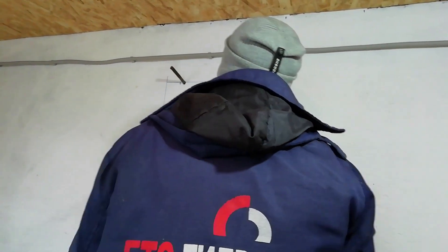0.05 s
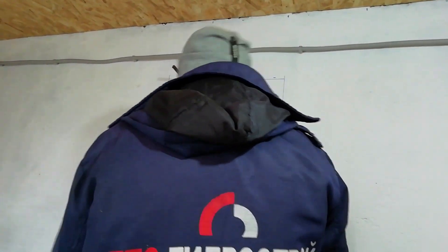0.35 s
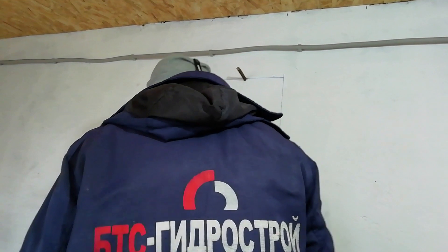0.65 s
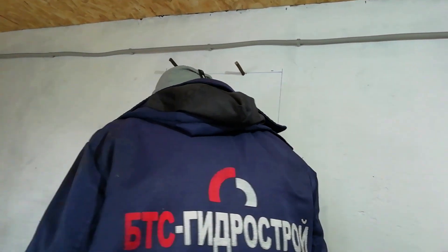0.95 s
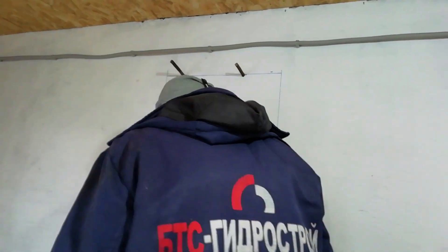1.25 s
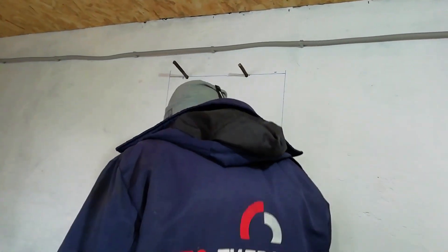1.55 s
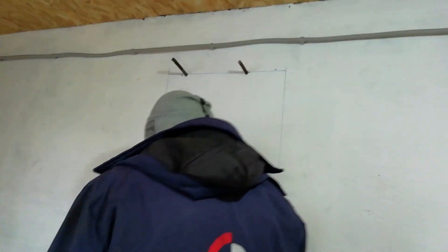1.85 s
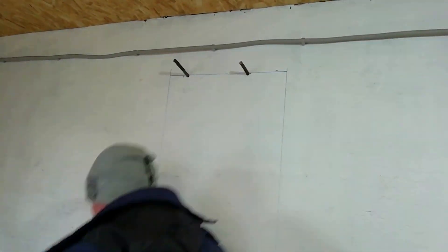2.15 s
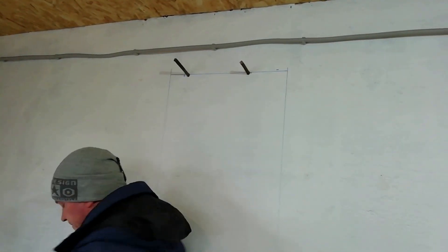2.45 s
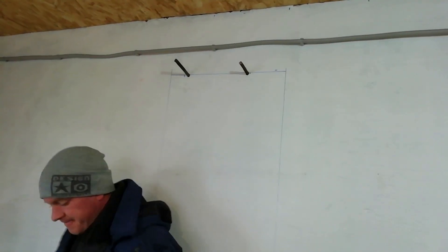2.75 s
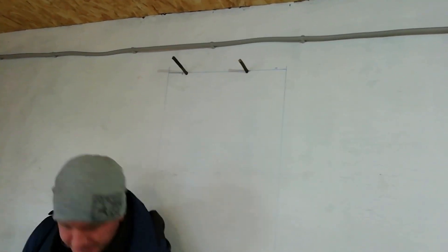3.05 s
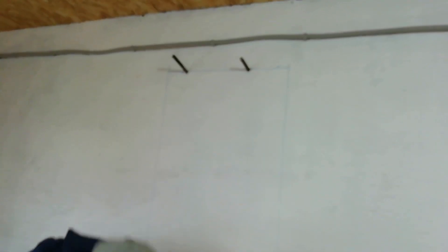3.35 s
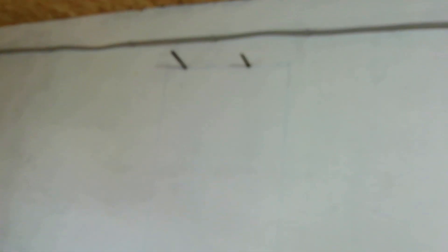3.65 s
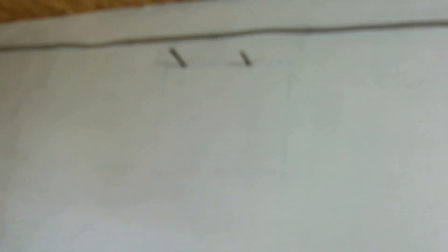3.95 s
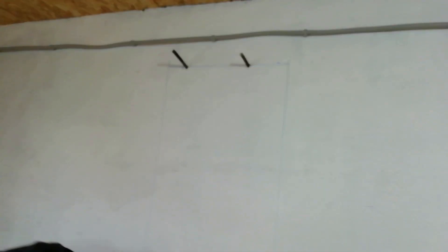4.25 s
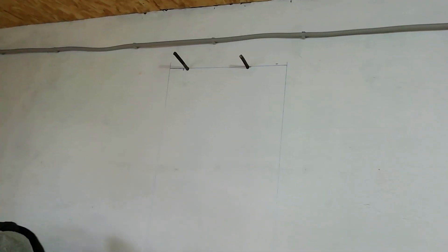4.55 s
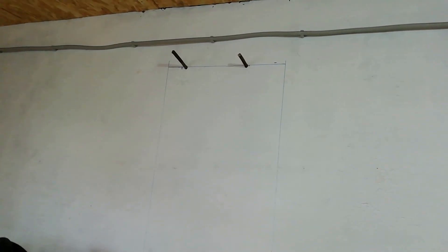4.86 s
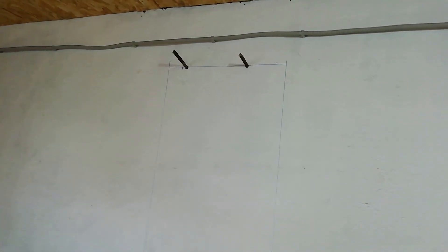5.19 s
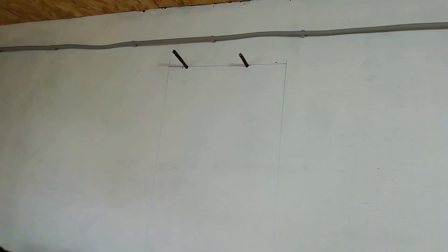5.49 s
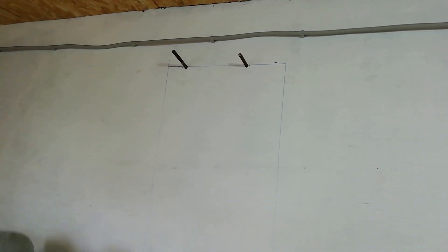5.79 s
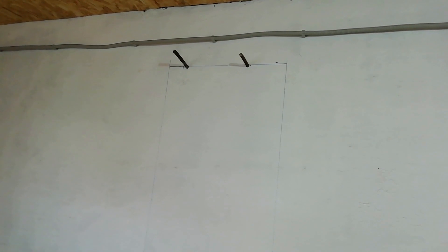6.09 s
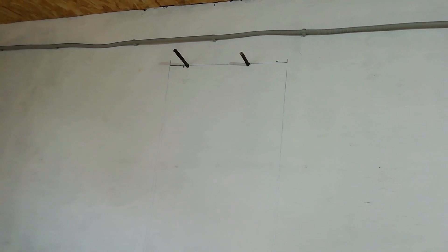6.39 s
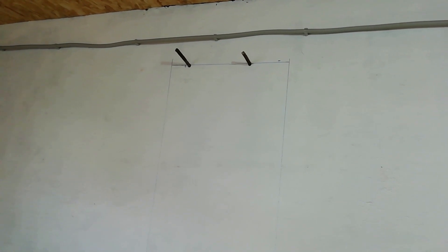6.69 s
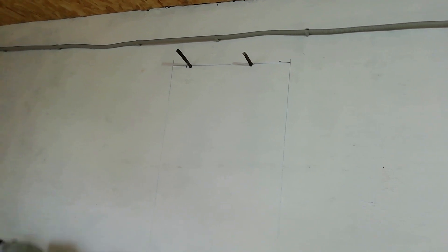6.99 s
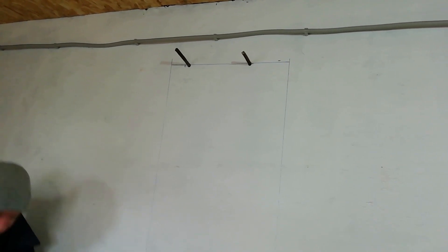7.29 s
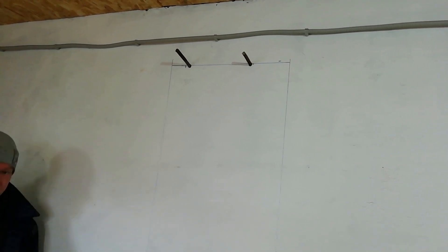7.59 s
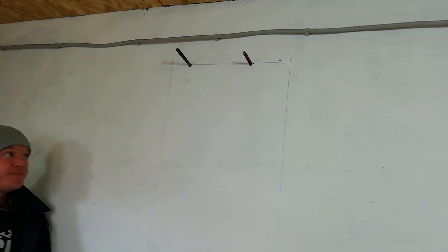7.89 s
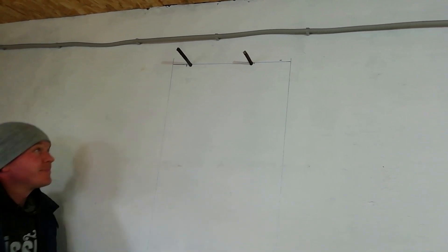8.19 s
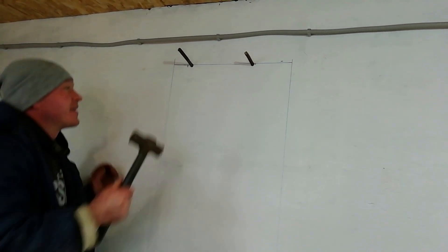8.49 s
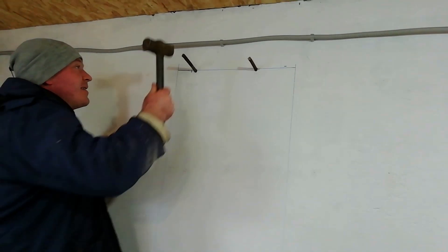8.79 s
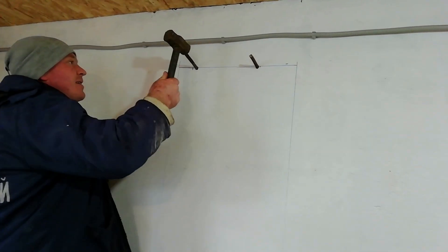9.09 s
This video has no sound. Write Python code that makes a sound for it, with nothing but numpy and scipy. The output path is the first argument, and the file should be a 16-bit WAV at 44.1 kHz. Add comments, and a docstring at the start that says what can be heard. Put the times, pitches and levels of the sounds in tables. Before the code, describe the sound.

In a bare room, a steel pin is worked into a plaster wall with small, dry taps. Boots step down from a wooden stand, with rustling clothes and gritty scuffs. The stand is shifted and its loose boards knock loudly in two hollow clusters. After a few softer steps, one heavy hammer blow lands on the pin, with a bright steel ring and a low boom from the wall.

```python
"""In a bare plastered room a workman in a padded jacket seats a steel pin in the wall with small taps.
From 2 s he climbs off a wooden stand: impacts of boots and boards excite broad resonances and low room
modes, while the friction of cloth and gritty soles hisses and rasps. From about 5 s he shifts the stand
along the wall and its loose boards knock. He steps up and, just after 9 s, lands one heavy hammer blow
on the pin: the steel rings in high modes and the wall booms in low ones."""
import sys
import numpy as np
from scipy import signal
from scipy.fft import rfft, irfft, next_fast_len
from scipy.io import wavfile

SR = 44100
rng = np.random.default_rng(int(sys.argv[2]) if len(sys.argv) > 2 else 0)


def pcm_store(signal):
    """Save signal as 16-bit PCM."""
    levels = np.round(np.clip(np.atleast_2d(signal), -1, 1) * 32767)
    wavfile.write(sys.argv[1], SR, levels.astype(np.int16).T)


N = 407484
TAP_HZ = np.fft.rfftfreq(4096, 1 / SR)  # frequencies at which filter gains are given
AGE = np.arange(SR) / SR  # seconds since a contact
MIC_LAG = 26  # samples of travel between the two microphones

# Spectrum of still air and microphone hiss. Each row: frequency in Hz, relative level in dB.
AIR_SPECTRUM = [(20, -5), (45, -3), (62, -10), (81, 2), (110, -6), (160, -6), (330, -11), (520, -17),
                (1100, -13), (1500, -13), (1830, -9), (2300, -18), (4000, -23), (9000, -28), (16000, -27)]
# Standing waves of the room. Each row: frequency in Hz, gain in dB, t60 (time to fall 60 dB) in seconds.
ROOM_MODES = [(84, -1, 0.51), (215, -8, 0.48), (246, -6.5, 0.6), (284, -8, 0.6), (309, -4, .55),
              (343, -17, 1.5), (450, -5.5, 0.64)]
# Strokes of soles and cloth. Each row: time of the peak in seconds, swell and fade over 20 dB in seconds,
# hiss level in dB, rasp offset in dB.
STROKES = [(0.17, 0.09, 0.31, -68, 8), (2.29, 0.014, 0.11, -42, -3), (2.727, 0.035, 0.075, -32.5, 0.5),
           (3.012, 0.029, 0.021, -42, 3.5), (3.52, 0.078, 0.2, -53, 3.5), (3.668, 0.09, 0.14, -38.5, 0.5),
           (3.86, 0.078, 0.092, -40.5, 5.5), (4.16, .2, .12, -62, -0.5), (4.39, 0.17, 0.21, -49.5, -3.5),
           (4.575, 0.071, .12, -55, -5), (4.862, 0.029, 0.34, -38, -1.5), (5.12, 0.11, 0.16, -40.5, 0),
           (5.245, 0.12, 0.093, -29.5, 2), (6.26, 0.12, 0.91, -49.5, 6), (6.68, 0.11, 0.27, -38, 7.5),
           (6.795, 0.12, 0.062, -35, 3.5), (7.7, .25, .25, -56, -8), (7.95, 0.098, 0.17, -55, 11.5),
           (8.5, .4, .8, -66.5, -6), (8.85, 0.034, 0.21, -38, 0), (9.0, 0.03, 0.26, -44.5, 4.5),
           (9.138, 0.044, .02, -48, 10)]
# Spectra of fine and of coarse friction. Each row: frequency in Hz, relative level in dB.
HISS_SPECTRUM = [(1180, -23), (2000, -7.5), (2380, -7), (3430, -9.5), (4990, -11), (7380, -9.5),
                 (9010, -20.5), (9740, -17), (14700, -14), (16000, -25.5)]
RASP_SPECTRUM = [(88, -39.5), (150, -6), (280, -3.5), (341, -10), (404, -7.5), (441, -5), (636, -7),
                 (765, -6), (1060, 0.5), (1670, -4), (2800, -19.5), (3640, -44), (6160, -120)]
# Soft footfalls and flexing boards. Each row: start in seconds, frequency in Hz, level in dB.
SOFT_BOOMS = [(2.625, 162, -43), (3.885, 458, -35.5), (5.35, 220, -32), (5.455, 183, -28.5),
              (6.29, 211, -37), (6.68, 454, -34), (7.49, 162, -50), (7.945, 232, -46), (8.87, 292, -45.5)]
# Sharp clacks and metal clinks. Each row: start in seconds, frequency in Hz, level in dB, t60 in seconds.
LIGHT_CLINKS = [(0.063, 1900, -31, .1), (0.17, 1710, -50.5, 0.87), (0.651, 3300, -42, .15),
                (2.328, 1190, -39, 0.082), (2.882, 2520, -60, .55), (4.388, 1800, -37.5, 0.1),
                (5.331, 1370, -21.5, 0.1), (5.332, 3180, -29, 0.18), (7.181, 1470, -43, 0.45),
                (8.61, 3000, -61, .28), (8.991, 1700, -43, 0.12)]
# Grains of grit snapping. Each row: start in seconds, frequency in Hz, level in dB, t60 in seconds.
GRIT_SNAPS = [(0.527, 13000, -56, 0.47), (1.039, 13500, -41, 0.15), (1.241, 13000, -59, .3),
              (2.165, 13000, -46.5, .15), (6.403, 13200, -37.5, .15), (8.68, 9800, -52.5, 0.36)]
# The four bands of an impact: thump, boom, clack, grit. Each row: low and high edge in Hz, gain in dB,
# t60 in seconds at a damping of 1, time constant of the contact in seconds, factor on the rise time.
IMPACT_BANDS = [(71, 163, -9.5, 0.66, 0.0077, 1.1), (172, 624, -5.5, 0.5, 0.0065, 1.5),
                (543, 3030, -2, .5, 0.0053, 1.33), (2600, 24000, -2.5, 0.62, 0.012, 1.6)]
# Boots landing on floor and stand, then loose boards knocking together. Each row: start in seconds,
# clack level in dB, boom level in dB, body resonance in Hz, clack resonance in Hz.
BOOT_STEPS = [(0.001, -35.5, -38.5, 236, 1090), (0.06, -30.5, -29.5, 396, 1380),
              (2.159, -36, -30, 288, 950), (2.247, -35.5, -34, 220, 760), (2.617, -43.5, -42, 171, 950),
              (3.003, -42.5, -47, 154, 1700), (3.501, -35, -40.5, 215, 1670),
              (3.887, -25.5, -24.5, 302, 740), (4.386, -41, -57, 292, 1790), (6.098, -56, -54, 215, 1850),
              (6.167, -45, -43.5, 242, 820), (6.398, -26.5, -19.5, 236, 930),
              (6.619, -32, -23.5, 430, 1140), (6.698, -25.5, -34, 212, 1360), (6.821, -34, -16, 268, 1230),
              (7.158, -41.5, -68, 220, 1480), (7.354, -43.5, -66, 194, 917), (7.908, -44, -60, 535, 1570),
              (8.064, -47.5, -57, 342, 1298), (8.179, -47, -78, 175, 1800), (8.26, -42, -32, 337, 1310),
              (8.88, -39, -37, 297, 1500), (8.987, -40, -66, 320, 1590)]
BOARD_KNOCKS = [(2.035, -34.5, -50.5, 342, 1120), (2.134, -33, -28.5, 250, 570),
                (2.326, -37.5, -26, 285, 1000), (5.278, -15, -18, 323, 1270),
                (5.329, -13, -20.5, 335, 1390), (5.41, -27.5, -19.5, 380, 1170),
                (6.415, -15.5, -12, 320, 1170), (6.463, -23, -11.5, 329, 1300),
                (6.754, -41, -19.5, 444, 1180)]
# Responses of the struck boards and of the pin in plaster. Each row: frequency in Hz, gain in dB.
WOOD_SPECTRUM = [(50, -12), (90, 3.5), (135, -11), (230, 3.5), (420, -0.5), (560, -10.5), (780, -4),
                 (1400, -2), (2000, -5.5), (2600, -15.5), (4200, -19), (7200, -19), (8800, -29),
                 (15000, -27)]
PLASTER_SPECTRUM = [(60, -16), (200, -12.5), (300, -6), (375, -2), (460, -3), (570, -21), (750, -1.5),
                    (960, -5), (1120, -0.5), (1420, -4), (1850, -4), (2600, -16), (7200, -14), (9000, -24),
                    (15000, -21)]
# The pin worked into its hole by hand. Each row: start in seconds, clack level in dB, boom level in dB,
# clack resonance in Hz.
SEATING_TAPS = [(0.524, -30.5, -39.5, 960), (0.648, -31, -37.5, 1810), (0.689, -40.5, -34.5, 1840),
                (0.721, -33, -37.5, 1860), (0.761, -33.5, -45, 1770), (0.824, -51, -60, 1800),
                (1.057, -35.5, -50, 1180), (1.084, -30.5, -37.5, 1110), (1.139, -38.5, -40.5, 754),
                (1.239, -39.5, -53, 1600), (1.319, -44.5, -46, 778), (1.389, -54.5, -49, 1024)]
# Spectrum of the hammer's thud and crack. Each row: frequency in Hz, relative level in dB.
BLOW_SPECTRUM = [(24, -52), (40, -9), (144, -6), (204, -7), (320, -8), (542, -9), (896, -9.5),
                 (1410, -23.5), (1760, -20), (2840, -26.5), (7000, -30), (9220, -49), (13100, -44),
                 (16000, -78)]
# Modes of pin and hammer head, then of the wall. Each row: frequency in Hz, level in dB, t60 in seconds.
STEEL_MODES = [(1760, -33, .35), (1900, -37, .15), (3908, -33, .5), (4660, -42, .2), (5373, -41, .4),
               (6853, -35, .35), (7050, -37, .25), (10750, -47, .16), (11080, -53, .3), (12810, -36, .19),
               (14120, -51, .13)]
WALL_MODES = [(75, -35, .8), (147, -26, .9), (250, -32, .7), (285, -33, .7), (317, -26, .7), (430, -29, .5),
              (822, -32, .45)]
# Unequal response of the two microphones. Each row: frequency in Hz, left minus right in dB.
MIC_BALANCE = [(100, 0.5), (400, -1), (900, -1), (1300, -3.5), (1900, -5.5), (2800, 1), (5200, -0.5),
               (6300, -5), (7300, -16), (8500, -3), (10000, 2.5), (12500, 14), (15500, 13.5)]


def amp(db):
    """Amplitude grows tenfold with every 20 dB."""
    return 10 ** (np.asarray(db) / 20)


def unit(x):
    """Normalisation to an rms of 1."""
    return x / np.sqrt(np.mean(x ** 2) + 1e-20)


def unit_attack(x):
    """Normalisation of a transient to an rms of 1 over its first 30 ms."""
    return x / np.sqrt(np.mean(x[..., :round(.03 * SR)] ** 2) + 1e-20)


def response(spectrum, hz=TAP_HZ):
    """Frequency response as an amplitude, interpolated in dB over log frequency."""
    known_hz, db = np.transpose(spectrum)
    return amp(np.interp(np.log(hz + 1), np.log(known_hz + 1), db))


def add(mix, start_s, sound):
    """Superposition: a sound adds to the mix from its start onward."""
    part = mix[..., max(round(start_s * SR), 0):][..., :sound.shape[-1]]
    part += sound[..., :part.shape[-1]]


def colour(x, gain):
    """Minimum-phase filtering: the phase follows from the log gain by the Hilbert transform."""
    log_gain = np.log(np.maximum(gain / gain.max(), 1e-5))
    mirrored = np.r_[log_gain, log_gain[-2:0:-1]]
    transfer = np.exp(np.conj(signal.hilbert(mirrored)))
    taps = np.fft.ifft(transfer).real
    return signal.oaconvolve(x, taps[None], axes=1)[:, :x.shape[1]]


def band(lo_hz, hi_hz):
    """Band-pass gain, falling 36 dB per octave beyond each edge."""
    return 1 / np.sqrt((1 + (lo_hz / (TAP_HZ + 1)) ** 12) * (1 + (TAP_HZ / hi_hz) ** 12))


def resonance(hz, width_hz):
    """Lorentzian resonance curve, with its full width taken at half height."""
    return 1 / (1 + (2 * (TAP_HZ - hz) / width_hz) ** 2)


def diffuse(size):
    """A diffuse noise field at two spaced points is coherent in the bass and incoherent in the treble."""
    padded = next_fast_len(size)
    left, independent = rfft(rng.standard_normal((2, padded)))
    coherence = np.sinc(2 * MIC_LAG * np.arange(len(left)) / padded)
    right = coherence * left + np.sqrt(1 - coherence ** 2) * independent
    return irfft([left, right], padded)[:, :size]


def still_air(level_db=-62.3):
    """Stationary noise: the air of the room and microphone hiss."""
    return amp(level_db) * unit(colour(diffuse(N), response(AIR_SPECTRUM)))


def room(x, wet_db, t60):
    """Reverberation: a diffuse echo follows the direct sound, which reaches the right side first."""
    tail = diffuse(SR) * amp(-60 * AGE / t60)
    echo = signal.oaconvolve(x[None], tail / np.linalg.norm(tail[0]), axes=1)[:, :len(x)]
    delayed = np.r_[np.zeros(MIC_LAG), x[:-MIC_LAG]]
    direct = np.array([delayed, x])
    return (direct + amp(wet_db) * echo) / np.hypot(1, amp(wet_db))


def standing_waves(x):
    """Forced resonance: low room modes hum on after the knocks that drive them."""
    hum = np.zeros(SR)
    for hz, db, t60 in ROOM_MODES:
        scale = 2 * np.log(1000) / (t60 * SR)  # makes db the gain at resonance
        hum += scale * amp(db - 60 * AGE / t60) * np.sin(2 * np.pi * hz * AGE)
    return signal.oaconvolve(x.mean(0), hum)[:N]


def friction(spectrum, slips_per_s, spread_db, smooth):
    """Stick-slip friction: countless impulses of uneven size over a smooth rub."""
    size = amp(spread_db * np.minimum(rng.exponential(1, N), 5))
    slips = size * rng.choice([-1, 1], N) * (rng.random(N) < slips_per_s / SR)
    rub = unit(slips) + smooth * rng.standard_normal(N)
    return unit(colour(rub[None], response(spectrum)))[0]


def scuffs(hiss_db=2, rasp_db=1):
    """Sliding friction of soles and cloth: fine grit hisses, coarser slips rasp, strokes add in power."""
    hiss, rasp = np.zeros((2, N))
    t = np.arange(N) / SR
    for peak_s, swell_s, fade_s, level_db, coarse_db in STROKES:
        # a Gaussian swell, then an exponential fade
        away = np.where(t < peak_s, ((peak_s - t) / swell_s) ** 2, (t - peak_s) / fade_s)
        stroke = amp(level_db - 20 * away)
        hiss = np.hypot(hiss, stroke)
        rasp = np.hypot(rasp, amp(coarse_db) * stroke)
    fine = friction(HISS_SPECTRUM, slips_per_s=2500, spread_db=4.2, smooth=0.51)
    coarse = friction(RASP_SPECTRUM, slips_per_s=500, spread_db=3.1, smooth=0.53)
    return room(amp(hiss_db) * hiss * fine + amp(rasp_db) * rasp * coarse, wet_db=3, t60=0.26)


def resonant_bursts(rows, rise_s):
    """Each light contact is a decaying noise that excites a single resonance."""
    out = np.zeros((2, N))
    for start_s, hz, width_hz, level_db, t60 in rows:
        envelope = (1 - np.exp(-AGE / rise_s)) * amp(-60 * AGE / t60)
        ring = colour(diffuse(SR) * envelope, resonance(hz, width_hz))
        add(out, start_s, amp(level_db) * unit_attack(ring))
    return out


def light_contacts(boom_width=0.35, boom_t60=0.44, clink_spread_s=0.03, snap_width=0.66):
    """Damped resonances of footfalls, clinks and grit: bandwidth is proportional to frequency."""
    booms = [(s, hz, boom_width * hz, db, boom_t60) for s, hz, db in SOFT_BOOMS]
    # the shorter a clink, the wider its resonance
    clinks = [(s, hz, hz * clink_spread_s / t60, db, t60) for s, hz, db, t60 in LIGHT_CLINKS]
    snaps = [(s, hz, snap_width * hz, db, t60) for s, hz, db, t60 in GRIT_SNAPS]
    return resonant_bursts(booms, rise_s=0.01) + resonant_bursts(clinks + snaps, rise_s=0.00062)


def impacts(contacts, spectrum, body_db, body_width_hz, clack_db, clack_width_hz, damping):
    """Impact excitation: a short rattle rings two resonances of the struck spot and decays in the room."""
    out = np.zeros((2, N))
    for start_s, levels_db, body_hz, clack_hz, hard_db, rise_s in contacts:
        body = amp(body_db) * resonance(body_hz, body_width_hz)
        clack = amp(clack_db) * resonance(clack_hz, clack_width_hz)
        shape = response(spectrum) * (1 + body + clack)
        rattle = diffuse(SR)
        for level_db, (lo_hz, hi_hz, gain_db, t60, contact_s, slowness) in zip(levels_db, IMPACT_BANDS):
            swell = 1 - np.exp(-AGE / (rise_s * slowness))  # the weight comes on
            fade = amp(-60 * damping * AGE / t60) + amp(hard_db) * np.exp(-AGE / contact_s)
            part = colour(rattle * swell * fade, shape * band(lo_hz, hi_hz))
            add(out, start_s, amp(level_db + gain_db) * unit_attack(part))
    return out


def hardness(boom_db, middling_db=-36.5):
    """Direct-to-reverberant ratio in dB: a heavier contact stands out more from its echo."""
    return 2.5 + 0.4 * (boom_db - middling_db)


def boot(start_s, clack_db, boom_db, body_hz, clack_hz, rise_s=0.0032):
    """The impact of a boot thumps the floor and crunches grit in proportion to its clack."""
    thump_db = clack_db + 0.35 * (boom_db - clack_db) - 1.5
    grit_db = clack_db - 5.5
    return start_s, (thump_db, boom_db, clack_db, grit_db), body_hz, clack_hz, hardness(boom_db), rise_s


def board(start_s, clack_db, boom_db, body_hz, clack_hz, rise_s=0.0033):
    """The impact of wood on wood is hollow, with little thump or grit."""
    thump_db = boom_db - 14.5
    grit_db = clack_db - 18.5
    return start_s, (thump_db, boom_db, clack_db, grit_db), body_hz, clack_hz, hardness(boom_db), rise_s


def pin_tap(start_s, clack_db, boom_db, clack_hz, hole_hz=399, hard_db=-4.5, rise_s=0.0031):
    """The hole resonates at one pitch; a tighter pin clacks higher and grinds more plaster."""
    thump_db = boom_db - 18
    grit_db = clack_db - 3.5 + 13.5 * np.log2(clack_hz / 1820)  # 13.5 dB more per octave
    return start_s, (thump_db, boom_db, clack_db, grit_db), hole_hz, clack_hz, hard_db, rise_s


def ringing(modes):
    """Free vibration: a sum of sinusoidal modes, each decaying at its own rate."""
    return sum(np.sqrt(2) * amp(db - 60 * AGE / t60) * np.sin(2 * np.pi * hz * AGE)
               for hz, db, t60 in modes)


def hammer(start_s=9.1457, thud_db=-22, crack_db=-25, push_db=-7, steel_db=-0.5, wall_db=-1.5):
    """The impact of steel on steel radiates a pulse, a thud and a crack, and rings pin and wall modes."""
    shape = response(BLOW_SPECTRUM)
    thud_fade = amp(-60 * AGE / 1.4) + 0.78 * np.exp(-AGE / 0.0036)
    thud = colour(diffuse(SR) * thud_fade, shape * band(97, 1470))
    crack_fade = amp(-60 * AGE / .5) + 4 * np.exp(-AGE / 0.0059)
    crack = colour(diffuse(SR) * crack_fade, shape * band(1360, 15000))
    push_s = 0.00052  # time constant of the push of air
    push = (AGE / push_s - 1) * np.exp(-AGE / push_s)
    steel = room(ringing(STEEL_MODES), wet_db=0, t60=0.14)
    blow = amp(thud_db) * unit_attack(thud) + amp(crack_db) * unit_attack(crack) + amp(push_db) * push
    blow += amp(steel_db) * steel - amp(wall_db) * ringing(WALL_MODES)
    out = np.zeros((2, N))
    add(out, start_s, blow)
    return out


def scene():
    """Superposition of all sources; boots and boards also drive the standing waves of the room."""
    contacts = [boot(*row) for row in BOOT_STEPS] + [board(*row) for row in BOARD_KNOCKS]
    knocks = impacts(contacts, WOOD_SPECTRUM, body_db=4.5, body_width_hz=90,
                     clack_db=3.5, clack_width_hz=400, damping=1.018)
    taps = [pin_tap(*row) for row in SEATING_TAPS]
    pin = impacts(taps, PLASTER_SPECTRUM, body_db=2.5, body_width_hz=36,
                  clack_db=-4.0, clack_width_hz=490, damping=1.49)
    return knocks + standing_waves(knocks) + pin + light_contacts() + scuffs() + hammer() + still_air()


def record(dry, cutoff_hz=15950):
    """Transduction: each microphone colours the sound, which clips at full scale and is low-passed."""
    padded = N + SR
    ratio = response(MIC_BALANCE, np.fft.rfftfreq(padded, 1 / SR))
    gains = np.array([ratio, np.ones_like(ratio)]) * np.sqrt(2 / (1 + ratio ** 2))  # constant total power
    coloured = irfft(rfft(dry, padded) * gains, padded)[:, :N]
    lowpass = signal.firwin(511, cutoff_hz, window=("kaiser", 9), fs=SR)
    return signal.oaconvolve(np.clip(coloured, -1, 1), lowpass[None], "same")


dry = scene()
out = record(dry)
pcm_store(out)
```